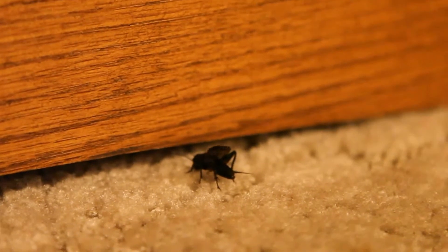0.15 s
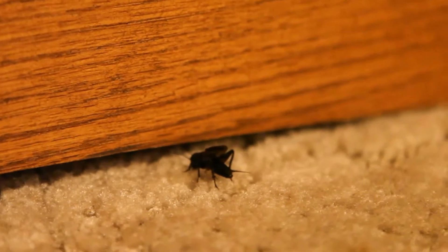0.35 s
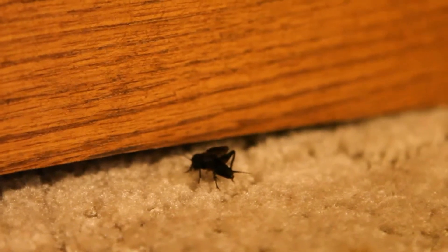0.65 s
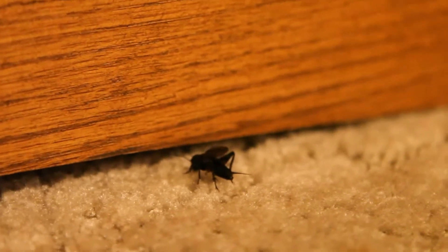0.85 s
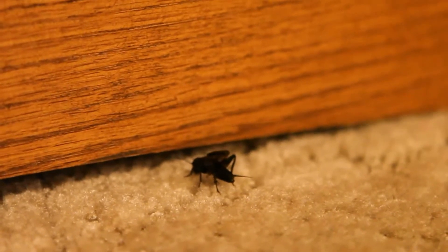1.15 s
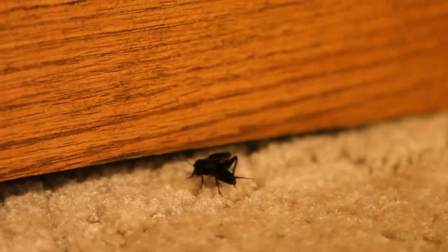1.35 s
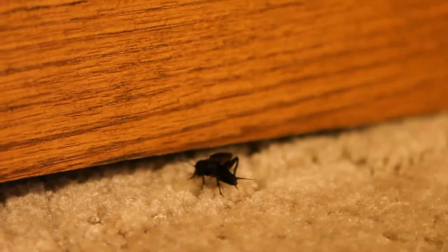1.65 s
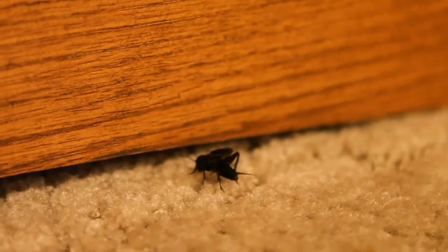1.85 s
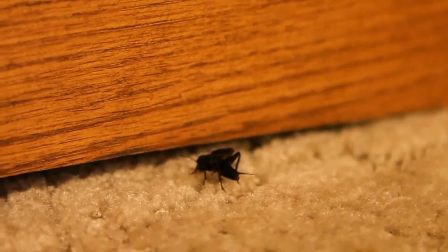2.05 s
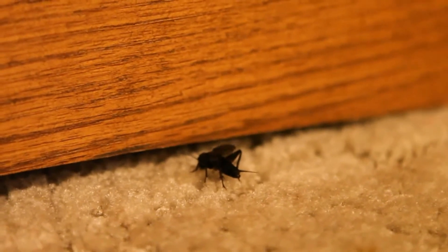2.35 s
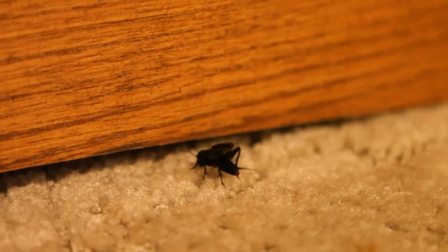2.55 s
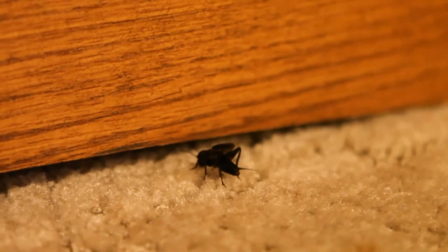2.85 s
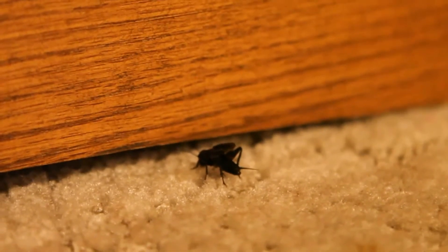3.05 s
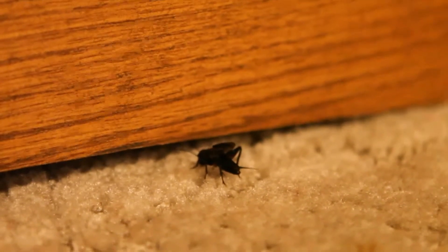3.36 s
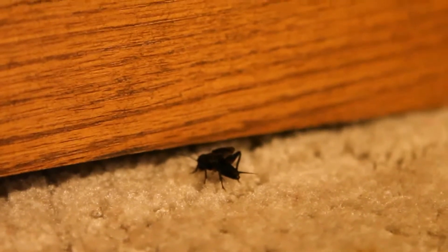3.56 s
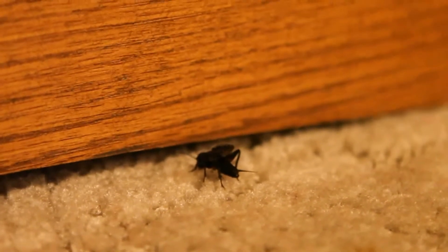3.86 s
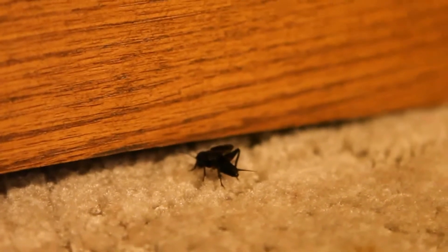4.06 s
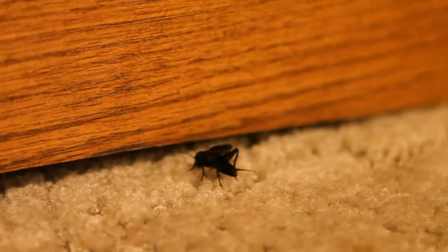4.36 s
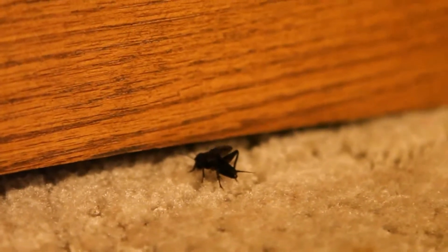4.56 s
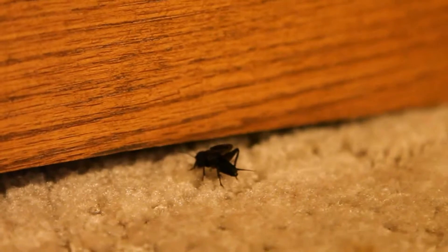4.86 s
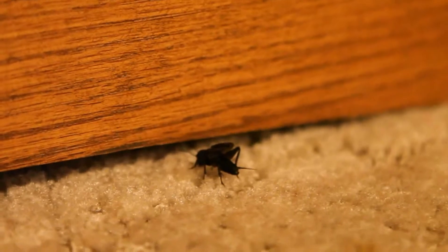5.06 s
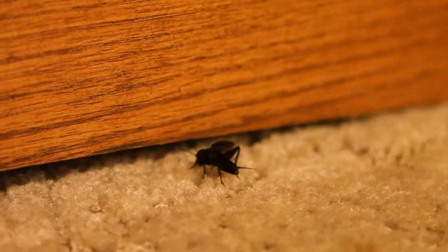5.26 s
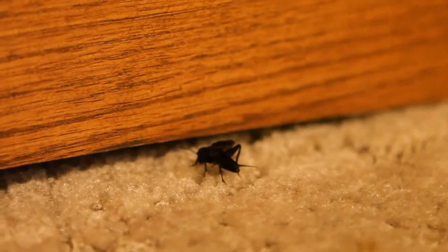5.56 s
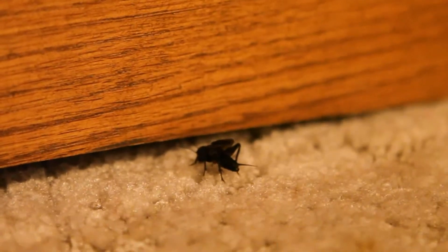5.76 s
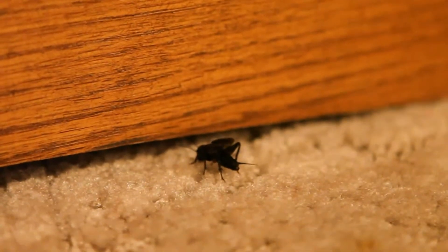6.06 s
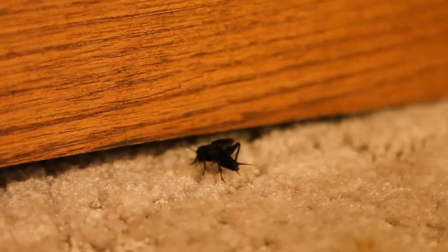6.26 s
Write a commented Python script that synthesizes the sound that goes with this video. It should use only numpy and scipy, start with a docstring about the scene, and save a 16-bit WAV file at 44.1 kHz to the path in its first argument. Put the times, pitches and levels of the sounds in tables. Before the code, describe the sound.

A quiet carpeted room with a very faint, slowly beating low motor and mains hum, soft hiss and a thin high electronic whine, constant from start to end. Close to the microphone one cricket chirps nine times, at about 0.27, 0.94, 1.8, 2.4, 3.0, 3.9, 4.6, 5.3 and 6.0 seconds. Each chirp lasts around 0.14 seconds: a very short soft pulse, then three fuller pulses of roughly 0.01 seconds, spaced nearly 0.05 seconds apart. They ring piercingly near 5.2 to 5.5 kilohertz, the first usually a little lower and weaker, with a slight rasp and a faint octave. Tiny grainy squeaks precede the pulses, much quieter. The third chirp at 1.8 seconds hesitates slightly, and the sixth at 3.9 ends with a shorter, lower pulse. A brief, light room echo follows each; only the background fills the pauses.

```python
"""Motors hum far off, beating against the mains, under hiss and a thin electronic whine throughout.
Over this a field cricket, close by on a carpet beside a wooden skirting board, gives nine chirps.
In each, the wings reopen with a faint squeak, then close: one short soft closing and three fuller ones.
Each closing draws a scraper over a toothed file; the wing rings at the tooth rate, with octave and rasp.
The room answers briefly, and a clock ripple in the electronics adds faint copies by modulation."""
import sys
import numpy as np
from scipy import signal
from scipy.fft import rfft, irfft
from scipy.io import wavfile

SR = 44100
rng = np.random.default_rng(int(sys.argv[2]) if len(sys.argv) > 2 else 0)


def wav_out(sig):
    """Save sig, one row per channel (or a flat mono array), as 16-bit PCM at SR to the path in sys.argv[1]."""
    wavfile.write(sys.argv[1], SR, np.round(np.clip(np.atleast_2d(sig).T, -1, 1) * 32767).astype(np.int16))


N = 282240
TIME = np.arange(N) / SR


def from_db(db):
    """Decibel definition: 20 dB is a tenfold amplitude."""
    return 10 ** (np.asarray(db) / 20)


def rms_one(x):
    """Normalisation: scale to unit rms."""
    return x / np.sqrt(np.mean(x ** 2) + 1e-20)


def at_hz(points, hz):
    """Interpolation along a logarithmic frequency axis, constant beyond the ends."""
    known_hz, values = np.transpose(points)
    return np.interp(np.log(np.maximum(hz, 1)), np.log(known_hz), values)


def noise(spectrum):
    """Spectral shaping: white noise weighted to the given colour, rms 1."""
    hz = np.fft.rfftfreq(N, 1 / SR)
    white = rng.standard_normal(N)
    return rms_one(irfft(rfft(white) * from_db(at_hz(spectrum, hz)), N))


def drift(corner_hz):
    """Low-pass random modulation: noise that falls off above the corner, rms 1."""
    hz = np.fft.rfftfreq(N, 1 / SR)
    white = rng.standard_normal(N)
    return rms_one(irfft(rfft(white) / (1 + (hz / corner_hz) ** 2), N))


def add(track, start, sound):
    """Superposition: mix a sound into a track at a time in seconds."""
    at = int(round(start * SR))
    track[at:at + len(sound)] += sound[:len(track) - at]


def steady_tone(hz, level_db, wander):
    """Phase modulation: a sine of the given rms level whose phase wanders slowly (rad)."""
    carrier = 2 * np.pi * (hz * TIME + rng.random())
    return np.sqrt(2) * from_db(level_db) * np.sin(carrier + wander * drift(1.0))


# mains and motor hum: f/Hz, rms level/dB, slow wavering of the level/dB
HUM = [(58.44, -69.7, .3), (111.5, -68.5, 2), (116.9, -78, .4), (120, -67.3, .2), (175.3, -77.3, .6),
       (180, -80, 2), (239.7, -83.2, 1)]


def motor_hum():
    """Interference: motor tones beat against nearby mains harmonics."""
    return sum(steady_tone(hz, db + waver_db * drift(2.0), .3 * waver_db) for hz, db, waver_db in HUM)


# electronic whine: f/Hz, rms level/dB
WHINE = [(1954, -76.6), (3071, -74.6), (4608, -81.5), (4883, -82.9), (6142, -76.6), (6837, -84.6),
         (7677, -74.7), (7736, -78.0), (8277, -82.6), (8398, -80.5), (8788, -82.7), (9117, -83.1),
         (9238, -83.4), (9356, -81.5)]


def electronic_whine():
    """Line spectrum: steady tones, each with a slowly wandering phase."""
    return sum(steady_tone(hz, db, 0.31) for hz, db in WHINE)


# colour of room rumble and microphone hiss: f/Hz, relative level per Hz/dB
FLOOR_COLOUR = [(20, -13.5), (35, -6), (55, -1.5), (130, -0.5), (250, -1), (500, -5), (1000, -6.5),
                (3000, -9), (6000, -9.5), (9000, -12), (10500, -15), (12800, -17.5)]


def noise_floor(level_db=-58.5):
    """Continuous spectrum: stationary rumble and hiss at one rms level."""
    return from_db(level_db) * noise(FLOOR_COLOUR)


def background():
    """Superposition of hum, whine and noise floor."""
    return motor_hum() + electronic_whine() + noise_floor()


# reverberation time by band: f/Hz, time to fall by 60 dB t/s
ROOM_T60 = [(4300, 0.276), (5400, 0.29), (7500, 0.39), (11000, 0.23)]


def late_tail(t):
    """Exponential decay: scattered sound dies at its own rate in each overlapping band."""
    spectrum = rfft(rng.standard_normal(len(t)))
    log_hz = np.log(np.fft.rfftfreq(len(t), 1 / SR) + 1)
    centres = np.log([row[0] for row in ROOM_T60])
    tail = 0
    for share, (_, t60) in zip(np.eye(len(centres)), ROOM_T60):
        band = irfft(spectrum * np.interp(log_hz, centres, share), len(t))
        tail = tail + band * from_db(-60 * t / t60)
    return tail


# colour of the echoes: f/Hz, relative level/dB
ROOM_COLOUR = [(3900, 8.5), (4700, 6.5), (5400, -8), (6100, 0), (7500, -1.5), (9500, 1), (11000, -2.5)]


def room(x, early_db=-24.5, early_s=0.01, late_db=-19.0):
    """Convolution with early and late responses; levels are relative to the direct rms."""
    t = np.arange(SR // 2) / SR
    hz = np.fft.rfftfreq(len(t), 1 / SR)
    early = rng.standard_normal(len(t)) * np.exp(-t / early_s)
    # the carpet swallows the nearest echoes
    build_up = np.interp(t, [.002, .012], [0, 1])
    out = 0
    for level_db, response in ((early_db, early), (late_db, late_tail(t))):
        coloured = irfft(rfft(response * build_up) * from_db(at_hz(ROOM_COLOUR, hz)), len(t))
        echoes = rms_one(signal.fftconvolve(x, coloured)[:N])
        out = out + from_db(level_db) * np.std(x) * echoes
    return out


# colour of the scraper's rubbing: f/Hz, relative level per Hz/dB
RASP_COLOUR = [(2000, -32), (3400, -31.5), (4400, -3.5), (5400, 2), (6000, 7.5), (6700, 1), (7800, 0.5),
               (8600, -15.5), (9400, -4.5), (10500, -6.5), (11600, -21.5), (12500, -13)]


def scraper_noise():
    """Friction: broadband noise of scraper on file, rms 1."""
    return noise(RASP_COLOUR)


# the wing rings louder as the tooth rate nears its resonance: pitch f/Hz, tone level/dB
WING_RESPONSE = [(5100, -21.7), (5250, -14.5), (5380, -10.3), (5520, -8.8)]


def wing_level(hz):
    """Resonance: tone level of the wing driven at a given tooth rate, in dB."""
    return at_hz(WING_RESPONSE, hz)


STROKE_S = .0125  # usual length of a full closing


def full_stroke(start, length, hz):
    """Forced vibration: a shorter stroke presses harder, up to the wing's widest swing."""
    halvings = np.log2(STROKE_S / length)
    tone_db = min(wing_level(hz) + 5 * halvings, -8.6)
    teeth_db = -33.5 + 5.5 * halvings
    return start, length, hz, tone_db, teeth_db


def lead_in_stroke(start):
    """Forced vibration: a short, soft closing well below the wing's resonance."""
    length, hz, teeth_db = .0042, 5100, -36.5
    return start, length, hz, wing_level(hz), teeth_db


def chirp_strokes(start, second_wait, third_wait, first_hz, second_hz, third_hz, third_length):
    """Stroke timing: a quick tempo clips the first full stroke; a short third lengthens the second."""
    # the lead-in follows a share of any hesitation beyond the usual wait
    lead_in = .0281 + .2 * (second_wait - .0447)
    first_length = min(STROKE_S, .275 * second_wait)
    second_length = STROKE_S + (STROKE_S - third_length) / 2
    second_start = start + second_wait
    return [lead_in_stroke(start - lead_in),
            full_stroke(start, first_length, first_hz),
            full_stroke(second_start, second_length, second_hz),
            full_stroke(second_start + third_wait, third_length, third_hz)]


# full strokes of each chirp: first start t/s, wait for second t/s, wait for third t/s,
# first pitch f/Hz, second pitch f/Hz, third pitch f/Hz, third length t/s
CHIRPS = [(.2665, .0436, .0490, 5300, 5520, 5540, .0103), (.9352, .0469, .0480, 5360, 5470, 5510, .0132),
          (1.7899, .0578, .0425, 5250, 5190, 5490, .0125), (2.3948, .0436, .0508, 5340, 5470, 5510, .0126),
          (3.0069, .0460, .0512, 5390, 5470, 5510, .0130), (3.9324, .0408, .0475, 5250, 5390, 5230, .0081),
          (4.5795, .0446, .0487, 5330, 5450, 5440, .0140), (5.3049, .0421, .0504, 5290, 5460, 5490, .0114),
          (6.0050, .0436, .0498, 5350, 5500, 5530, .0128)]


def all_chirps():
    """Rhythm: the four closings of every chirp, in order of time."""
    return [chirp_strokes(*chirp) for chirp in CHIRPS]


def squeaks(slides, length_s, bend, jitter, grain_db, octave_db, rub_db):
    """Stick-slip: light, unsteady slides give a grainy tone that rises and falls back."""
    tone, swell = np.zeros((2, N))
    wobble, grain = drift(900), drift(600)
    u = np.linspace(-1, 1, int(length_s * SR))
    for middle, level_db, pitch_hz in slides:
        start = middle - length_s / 2
        here = int(start * SR) + np.arange(len(u))
        glide = bend * (1 / 6 + u / 3 - u ** 2)
        hz = pitch_hz * (1 + glide + jitter * wobble[here])
        phase = 2 * np.pi * np.cumsum(hz) / SR
        pressure = from_db(level_db + grain_db * grain[here]) * (1 - u ** 2)
        add(tone, start, pressure * (np.sin(phase) + from_db(octave_db) * np.sin(2 * phase)))
        add(swell, start, pressure)
    return tone + from_db(rub_db) * swell * scraper_noise()


# the scraper slides back before each of a chirp's four closings:
# middle of the slide ahead of the closing t/s, level within its group/dB, nominal pitch f/Hz
OPENINGS = [(.022, -43, 4330), (0.012, -50, 4450), (.0215, -38.5, 7250), (.0207, -38, 7520)]


def openings(slow_db=-1.0, fast_db=0.5):
    """Reverse stroke: wings reopen slowly and low at first, fast and high between full strokes."""
    low, high = [], []
    for strokes in all_chirps():
        slides = [(stroke[0] - ahead, db, hz) for stroke, (ahead, db, hz) in zip(strokes, OPENINGS)]
        low += slides[:2]
        high += slides[2:]
    slow = squeaks(low, length_s=.014, bend=.13, jitter=.06, grain_db=3., octave_db=-7., rub_db=-8.)
    fast = squeaks(high, length_s=.010, bend=.17, jitter=.05, grain_db=3., octave_db=-30., rub_db=-10.)
    return from_db(slow_db) * slow + from_db(fast_db) * fast


# slow strokes only fall in pitch, fast ones stumble and then arch:
# middle pitch f/Hz, early offset f/Hz, late offset f/Hz, stumble depth f/Hz
GLIDE = [(5100, 100, -55, 0), (5250, 105, -175, 60), (5380, 50, -250, 110), (5470, -10, -225, 220),
         (5520, -30, -190, 230)]


def stroke_shape(t, length, pitch_hz):
    """Kinematics: tooth rate (Hz), contact (0-1) and ringing (dB) during one closing."""
    middle_hz, *offsets = np.transpose(GLIDE)
    early_hz, late_hz, stumble_hz = [np.interp(pitch_hz, middle_hz, column) for column in offsets]
    # a parabola through three pitches follows the wing's changing speed
    pitches = [pitch_hz + early_hz, pitch_hz, pitch_hz + late_hz]
    arch = np.polyval(np.polyfit([.2, .5, .8], pitches, 2), np.minimum(t / length, .92))
    # the first teeth snap past fast, then hold the scraper back for a moment
    snap_hz = 900 * np.exp(-t / .0003)
    stumble = stumble_hz * np.exp(-((t - .0009) / .0009) ** 2)
    # the wing rings less as the tooth rate sinks under its resonance
    sag_db = np.clip(.022 * (arch - .3 * stumble - np.mean(pitches[:2])), -8, .4)
    onset = 1 - np.exp(-(t / .0005) ** 1.5)
    contact = onset / (1 + np.exp((t - length) / .00025))
    return arch + snap_hz - stumble, contact, sag_db


def closings(catch_s=0.0014, octave_db=-1.0, rasp_db=-10.5, catch_db=9.0):
    """Stridulation: the scraper passes one tooth a cycle and the wings ring at the tooth rate."""
    tone, octave, scrape = np.zeros((3, N))
    jitter_hz = 22 * drift(600)
    shimmer_db, octave_shimmer_db = .35 * drift(400), 2 * drift(1200)
    strokes = [stroke for chirp in all_chirps() for stroke in chirp]
    for start, length, pitch_hz, level_db, teeth_db in strokes:
        t = np.arange(int(2 * length * SR)) / SR
        here = int(start * SR) + np.arange(len(t))
        hz, contact, sag_db = stroke_shape(t, length, pitch_hz)
        phase = 2 * np.pi * np.cumsum(hz + jitter_hz[here]) / SR
        swing = contact * from_db(level_db + sag_db + shimmer_db[here])
        add(tone, start, swing * np.sin(phase))
        # tooth impacts add an octave and a rasp, with a level separate from the swing
        impacts = contact * from_db(teeth_db)
        add(octave, start, impacts * from_db(octave_shimmer_db[here]) * np.sin(2 * phase))
        # the scraper rattles until the teeth catch in step
        catching = np.exp(-(t / catch_s) ** 2)
        add(scrape, start, impacts * (from_db(rasp_db) + from_db(catch_db) * catching))
    return tone + from_db(octave_db) * octave + scrape * scraper_noise()


def scene():
    """Superposition of the cricket, its room and the background."""
    cricket = closings() + openings()
    return (cricket + room(cricket) + background())[None]


def record(dry, first_db=-35.5, second_db=-48.5, ripple_cut_hz=8000):
    """Amplitude modulation: a clock ripple adds shifted, dulled copies; a steep low-pass cuts the top."""
    clock_hz, cutoff_hz = 3906, 12800
    clock = 2 * np.pi * clock_hz * TIME
    # each sideband has half the ripple's amplitude, hence the factor 2
    ripple = 2 * from_db(first_db) * np.sin(clock) + 2 * from_db(second_db) * np.sin(2 * clock)
    dulling = signal.butter(1, ripple_cut_hz, fs=SR, output="sos")
    copies = signal.sosfilt(dulling, dry * ripple)
    top_cut = signal.ellip(12, .1, 70, cutoff_hz, fs=SR, output="sos")
    return signal.sosfilt(top_cut, dry + copies)


dry = scene()
out = record(dry)
wav_out(out)
```